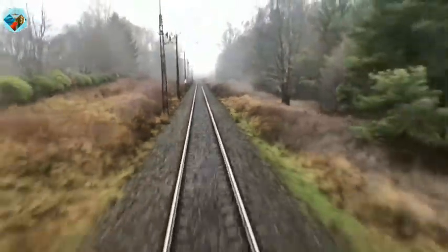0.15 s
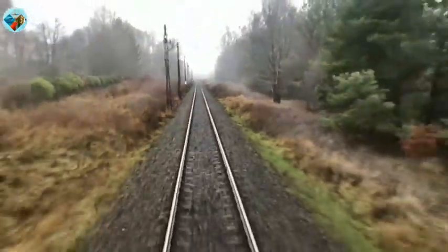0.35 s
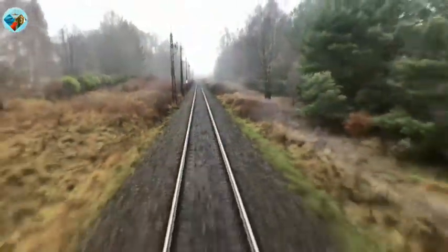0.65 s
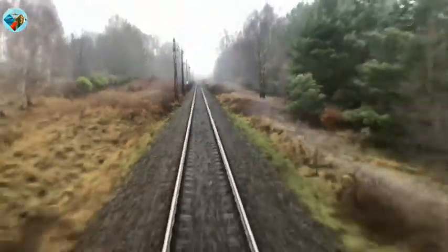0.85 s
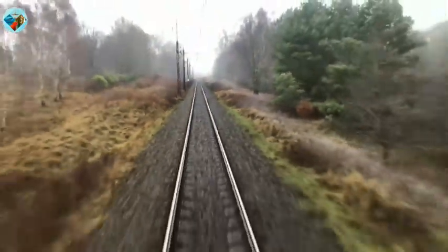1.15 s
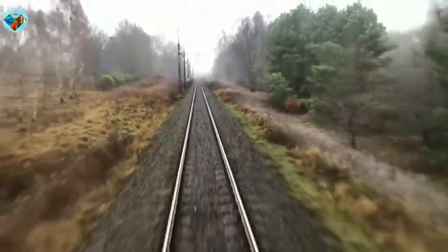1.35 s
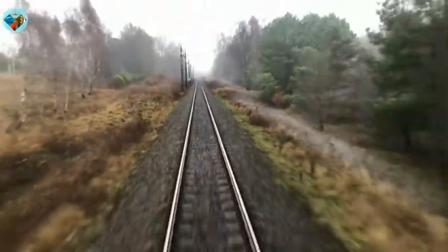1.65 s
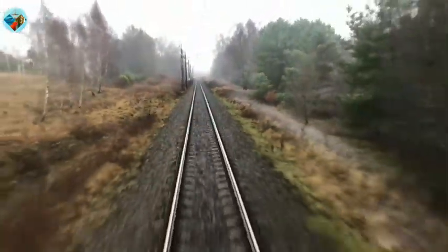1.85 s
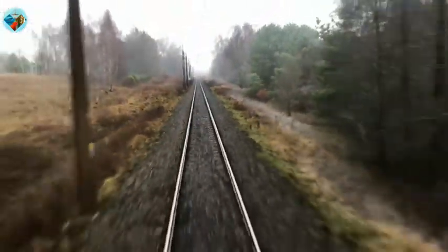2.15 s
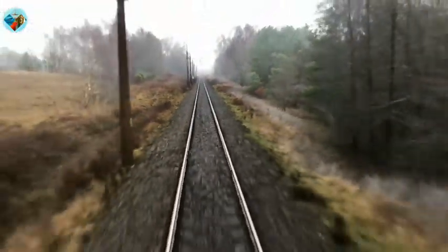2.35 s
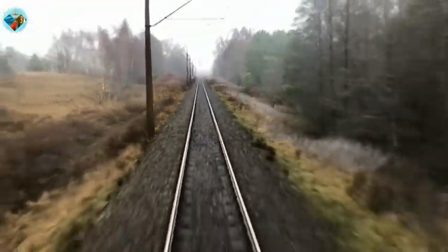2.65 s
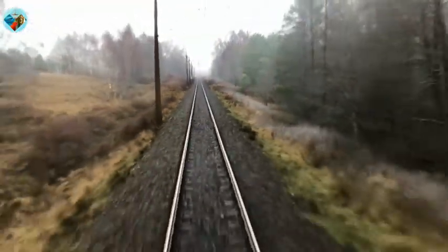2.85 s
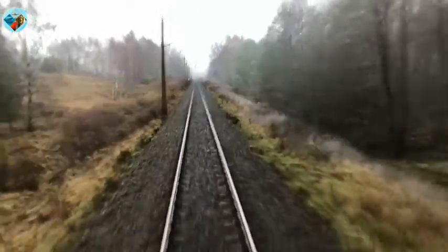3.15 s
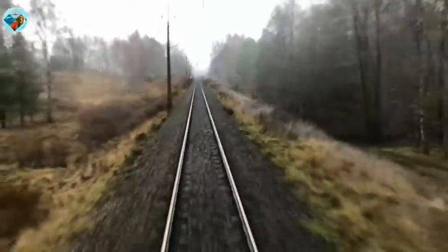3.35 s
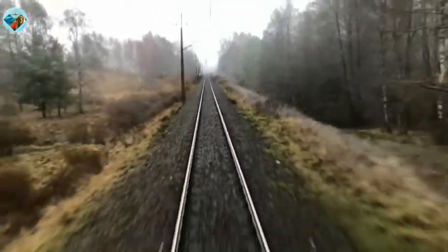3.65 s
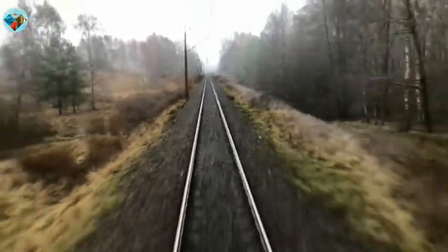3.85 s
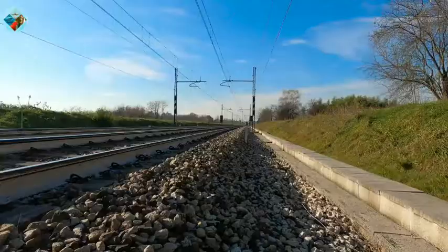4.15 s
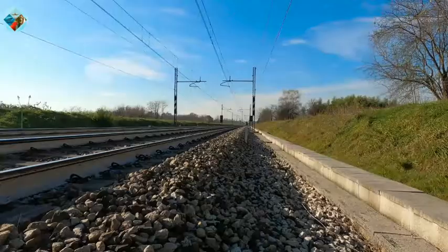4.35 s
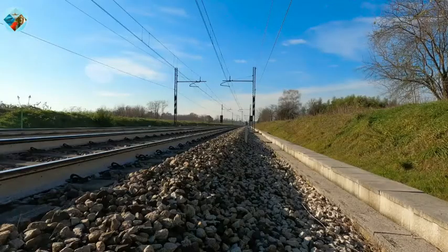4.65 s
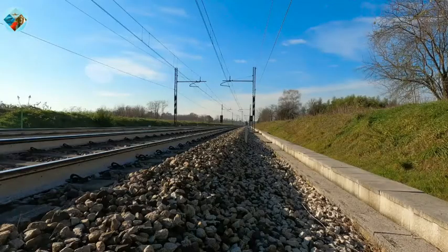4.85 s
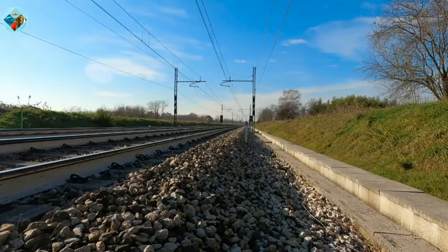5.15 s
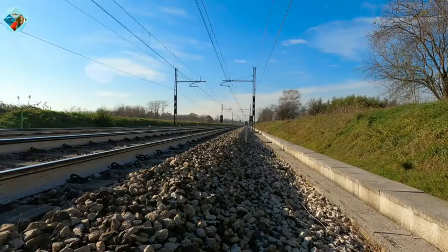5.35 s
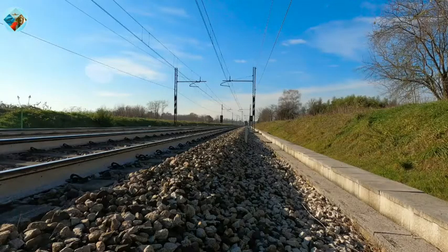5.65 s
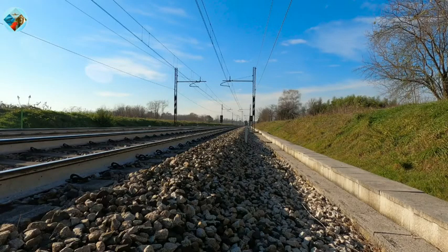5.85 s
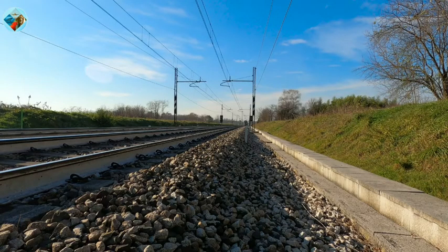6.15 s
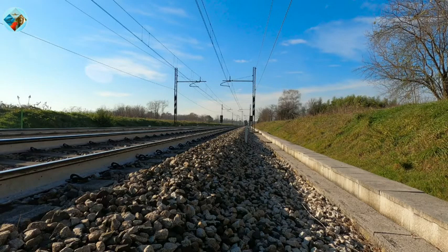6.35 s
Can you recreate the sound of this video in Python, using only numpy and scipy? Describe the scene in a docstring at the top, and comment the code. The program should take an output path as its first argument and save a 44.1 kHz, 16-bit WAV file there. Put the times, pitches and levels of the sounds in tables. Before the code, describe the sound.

From 0 to 4.1 s, the front of a running train: a loud, continuous, rough roar of wheels on rails, with deep boom and rumble swaying slightly. A low shaft throb comes and goes, and thin wavering gear whines thread through the middle and upper range. Small, very high, rough flange squeaks flick by around 1.1-1.4, 1.9-2.0 and 3.45 s; airy puffs pass, the clearest at 2.3 s. At 4.1 s the ride cuts dead, leaving a tiny gap. From 4.15 s, a much quieter open trackside: low wind buffets the microphone, gusting near 4.6 s and slowly freshening, over faint murmur and thin air, with a slight rustle at 4.6 s. A narrow trembling metallic rail hum rises as a far train nears. Isolated soft pings appear at 5.2, 5.7 and 5.9 s, then crowd quickly from 6.2 s until the abrupt end around 6.5 s.

```python
"""First the front of a running train: wheels roar on the rails, a shaft throbs, gears whine, flanges squeak.
Noise with shaped tone makes the roar and puffs of air; wavering sines make the throb, whine and squeaks.
After a cut and a short silence, a quiet trackside: wind on the microphone (low noise) and a rail that
starts to sing (narrow noise with short pulses) as a far train comes nearer."""
import sys
import numpy as np
from scipy import signal
from scipy.fft import rfft, irfft, next_fast_len
from scipy.io import wavfile
from scipy.ndimage import uniform_filter1d, map_coordinates

SR = 44100
rng = np.random.default_rng(int(sys.argv[2]) if len(sys.argv) > 2 else 0)


def to_linear_factor(level_db):
    """Convert decibel levels (scalar or array-like) to linear amplitude factors."""
    exponent = np.asarray(level_db, float) / 20
    return 10 ** exponent


def unload_wav(signal):
    """Save mono or channel-first audio to the path in sys.argv[1] as 16-bit WAV at rate SR, clipped to [-1, 1]."""
    wavfile.write(
        sys.argv[1],
        SR,
        np.round(np.clip(np.atleast_2d(signal).T, -1, 1) * 32767).astype(np.int16),
    )


N = 285768  # samples
CUT_S, RESUME_S = 4.0935, 4.1525  # the ride ends; the trackside begins


def unit(x):
    """Scales a sound to an average strength (rms) of 1."""
    return x / np.sqrt(np.mean(x ** 2) + 1e-20)


def curves(rows):
    """Draws straight lines between rows: one curve for each column after the time."""
    s, *cols = np.transpose(rows)
    return [np.interp(np.arange(N) / SR, s, c) for c in cols]


def wobble(rate):
    """A smooth random curve through `rate` random points a second."""
    coarse = np.arange(0, N + 32, 32)  # worked out at every 32nd sample, then joined by lines
    points = rng.standard_normal(int(N * rate / SR) + 4)
    curve = map_coordinates(points, [coarse * rate / SR])
    return np.interp(np.arange(N), coarse, curve)


def colour(points):
    """Turns (pitch_hz, level_db) points into a gain for any pitch, joined on a log pitch axis."""
    f, db = np.transpose(points)
    return lambda hz: to_linear_factor(np.interp(np.log(hz + 1), np.log(f + 1), db))


def rush(gain, patchy_db):
    """Noise of rms 1 with this gain over pitch, uneven in patches of time and pitch."""
    z = signal.stft(rng.standard_normal(N), nperseg=512)[2]
    field = uniform_filter1d(rng.standard_normal(z.shape), 5, 0)
    field = uniform_filter1d(field, 14, 1)
    noise = signal.istft(z * to_linear_factor(patchy_db * unit(field)), nperseg=512)[1][:N]
    m = next_fast_len(N + 8192)
    spectrum = rfft(noise, m) * gain(np.fft.rfftfreq(m, 1 / SR))
    return unit(irfft(spectrum, m)[:N])


def bump(s, length):
    """A bell-shaped swell around time s."""
    return np.exp(-8 * ((np.arange(N) / SR - s) / length) ** 2)


def swells(rows):
    """Adds up bell-shaped swells in amplitude."""
    return sum(to_linear_factor(db) * bump(s, length) for s, length, db in rows)


def lift_db(rows):
    """Adds up bell-shaped lifts and dips in dB."""
    return sum(db * bump(s, length) for s, length, db in rows)


def tone(hz):
    """A sine of rms 1 that follows a pitch curve."""
    return np.sqrt(2) * np.sin(2 * np.pi * (np.cumsum(hz) / SR + rng.random()))


def rolling():
    """Rough rail shakes wheels and car body: four bands of noise follow the roughness and the shake."""
    # tone of the wheel noise: pitch_hz, level_db (per Hz)
    wheel_colour = [(15, -33.5), (25, -8), (113, 3), (204, -2.5), (240, -3), (458, -9.5), (873, -4),
                    (1810, -20), (2010, -11), (2180, -19), (3010, -24.5), (3740, -25), (5300, -35.5),
                    (9850, -44.5), (15600, -56)]
    # resonances of car body and wheels: pitch_hz, width_hz, level_db
    resonances = [(58, 19, -0.5), (80.2, 30, 4), (100, 14, -3), (245.5, 51, 5.5), (393, 37, 4.5),
                  (467, 63, -1), (916, 68, 2), (1210, 40, -1), (1347, 33, 6.5), (1593, 120, 5),
                  (1726, 120, 0), (1920, 91, -0.5), (2040, 110, 1.5), (2090, 40, -3), (2280, 50, 2.5),
                  (2480, 34, 5.5), (3775, 49, 7), (6900, 450, 3)]
    # the ride: time_s, roughness under the wheels (level_db), shake of the car body above it (level_db)
    ride = [(0.0, -22.5, -6.5), (0.06, -22.5, -2.5), (0.66, -21.5, -2.5), (1.0, -21, 2.5), (1.15, -20, -5),
            (1.19, -24.5, 2), (1.28, -19, -7), (1.31, -21.5, -1), (1.87, -21, -2.5), (1.95, -18, -10.5),
            (2.01, -21.5, 0.5), (2.07, -22, -8), (2.31, -19, -0.5), (2.41, -21.5, -2), (3.99, -22, 0),
            (4.08, -19.5, -4.5)]

    def body(hz):
        peaks_db = sum(db / (1 + (2 * (hz - c) / w) ** 2) for c, w, db in resonances)
        return colour(wheel_colour)(hz) / (1 + (36 / (hz + 1)) ** 4) * to_linear_factor(peaks_db)

    def above(hz, edge):
        return 1 / (1 + (edge / (hz + 1)) ** 8)

    def band(low_hz, high_hz, patchy_db):
        def gain(hz):
            return body(hz) * np.sqrt(np.abs(above(hz, low_hz) - above(hz, high_hz)))
        return rush(gain, patchy_db)

    rough_db, shake_db = curves(ride)
    on_board = slice(round(CUT_S * SR))
    mean_db = np.mean(rough_db[on_board])
    rough_swing_db = rough_db - mean_db
    shake_swing_db = shake_db - np.mean(shake_db[on_board])
    jolt_db = .25 * wobble(14)  # bumps in the track reach every band
    # low_hz, high_hz, dB over mean roughness, share of its swing, share of the shake, own sway dB, patches dB
    bands = [(1, 160, -5.5, 0.6, 1.13, 1.16, -0.1),  # boom
             (160, 450, -3, 1.2, 0.62, 1.53, 0.2),  # rumble
             (450, 2800, -0.24, .9, .05, 0.35, 1.52),  # roar
             (2800, SR, -19.5, .5, 0.1, 0.48, 1.5)]  # hiss
    out = np.zeros(N)
    for low_hz, high_hz, db, swing, shaken, sway_db, patchy_db in bands:
        level_db = mean_db + db + swing * rough_swing_db + shaken * shake_swing_db
        level_db = level_db + sway_db * wobble(8) + jolt_db
        out += to_linear_factor(level_db) * band(low_hz, high_hz, patchy_db)
    return out


def shaft():
    """A turning shaft throbs low at its own rate; a tone near the third multiple swells now and then."""
    # the low throb sinks: middle_s, length_s, change_db
    throb_lulls = [(0.05, .5, -4), (1.08, .3, -18), (1.37, .2, -8), (2.15, .7, -16), (2.6, .15, -8),
                   (3.38, .15, -9), (3.65, .2, -13), (4.09, .15, -8)]
    # the third multiple swells: middle_s, length_s, level_db
    third_swells = [(.55, .2, -32), (.86, 0.57, -23.5), (1.27, 0.23, -36), (1.84, 0.45, -39),
                    (2.49, .15, -42), (2.7, .3, -41), (3.15, 0.56, -28.5), (3.47, 0.17, -32),
                    (3.9, 0.37, -32.5)]
    throb_db, third_db = -30.5, -45.5  # throb between its lulls; third multiple between its swells
    throb_level = to_linear_factor(throb_db + lift_db(throb_lulls) + .8 * wobble(5))
    throb = throb_level * tone(38 + 0.36 * wobble(4.0))  # Hz
    third = (to_linear_factor(third_db) + swells(third_swells)) * tone(111.5 + 1.087 * wobble(4.1))  # Hz
    return throb + third


def gears():
    """Gear teeth give thin lines that waver in pitch and level; the load on them lifts the upper lines."""
    # lines of the whine: pitch_hz, level_db, waver_hz
    whine_lines = [(232.5, -37, 2), (817, -36, 1.5), (854.8, -34, 1.5), (891, -41, 2), (914, -41, 2),
                   (932, -42, 2), (1057, -44, 2), (1092, -43, 2), (1142.6, -44, 2), (1222, -47, 4),
                   (1890, -52, 4), (1927, -49, 5), (1982, -44, 4), (2020, -40, 4), (2075, -50, 6),
                   (2364, -56, 6), (2475, -53, 5), (2789, -57, 6), (3354, -65, 6)]
    # gear load: time_s, change_db
    gear_load = [(0, 4.5), (.8, 5), (1.1, -8), (1.5, 3), (2.12, 2), (2.5, 3), (3.3, 0), (3.8, 3.5),
                 (4.08, -5)]
    load_db, = curves(gear_load)
    out = np.zeros(N)
    for hz, db, waver_hz in whine_lines:
        flutter = unit(to_linear_factor(4 * wobble(16)))
        level = to_linear_factor(db + load_db * (hz > 1500))
        out += level * flutter * tone(hz + waver_hz * wobble(14))
    return out


def flanges():
    """Wheel flanges give short rough squeaks, most of them sagging in pitch."""
    # squeaks: middle_s, length_s, start_hz, end_hz, level_db
    squeaks = [(.97, .08, 11100, 10900, -68), (1.10, .06, 13400, 13200, -66), (1.111, .07, 9800, 9700, -55),
               (1.15, .05, 9600, 9500, -54), (1.158, .09, 13000, 13000, -64), (1.275, .05, 9800, 9750, -58),
               (1.337, .09, 15200, 13980, -63), (1.345, .07, 9550, 9300, -54),
               (1.42, .05, 12800, 12600, -57), (1.43, .05, 9450, 9160, -58),
               (1.85, .05, 14600, 14100, -67.5), (1.925, 0.065, 10150, 10000, -52),
               (1.92, .09, 13900, 13400, -63), (1.985, .07, 9850, 9700, -49.5),
               (2.015, .04, 12800, 12300, -64), (3.396, .04, 9700, 9560, -54),
               (3.443, .08, 13900, 13500, -64), (3.449, .05, 10100, 9750, -46),
               (3.48, .07, 10000, 10100, -54.5)]
    out = np.zeros(N)
    rough, flutter = wobble(400), wobble(70)
    for s, length, start_hz, end_hz, db in squeaks:
        i = np.arange(round((s - length) * SR), round((s + length) * SR))
        u = (i / SR - s) / length  # -0.5 at the start pitch, 0.5 at the end pitch
        pitch = (start_hz + end_hz) / 2 + (end_hz - start_hz) * u
        pitch = pitch + .010 * start_hz * rough[i]
        out[i] += to_linear_factor(db + 3 * flutter[i]) * np.exp(-8 * u ** 2) * tone(pitch)
    return out


def swishes():
    """Puffs of bright air noise over a faint flicker that never quite rests."""
    # puffs: middle_s, length_s, level_db
    puffs = [(.43, 0.06, -57), (.66, 0.14, -58), (.97, 0.16, -52), (1.33, .1, -59.5), (1.8, 0.11, -55),
             (1.94, 0.12, -64), (2.275, .12, -42), (2.72, 0.065, -63), (3.15, .06, -66), (3.45, 0.15, -51),
             (4.03, 0.11, -55.5)]
    # tone of the air: pitch_hz, level_db (per Hz)
    puff_colour = [(500, -59), (1500, -9), (4000, 2), (9000, -3), (15500, -10.5)]
    flicker = to_linear_factor(-67 + 3 * wobble(30))  # dB
    return (swells(puffs) + flicker) * rush(colour(puff_colour), patchy_db=1.2)


def since_resume():
    """Seconds since the trackside began, zero before that."""
    return np.maximum(np.arange(N) / SR - RESUME_S, 0)


def nearness_db():
    """Growth of the far train's sound as the distance and the loss along the rail shrink."""
    arrival_s, rail_loss_db_per_s = 7.26, 4.5  # the arrival lies after the end of the sound
    since = since_resume()
    distance = np.maximum(1 - since / (arrival_s - RESUME_S), .05)  # 1 = where it is at first
    return rail_loss_db_per_s * since - 20 * np.log10(distance)


def wind():
    """Wind buffets the microphone: low uneven noise that freshens, with gusts and lulls."""
    # gusts and lulls: middle_s, length_s, change_db
    gusts = [(4.6, .12, 5.5), (5.21, .1, -10), (5.4, .1, 4), (5.46, .06, -9)]
    # tone of the buffeting: pitch_hz, level_db (per Hz)
    buffet_colour = [(5.9, -48), (10, -17), (30, -3), (54, 0), (74, -7), (92, -16), (115, -35), (150, -68),
                     (250, -120)]
    start_db, rise_db_per_s = -42, 2.5
    level_db = start_db + rise_db_per_s * since_resume() + lift_db(gusts)
    return to_linear_factor(level_db) * unit(to_linear_factor(0.63 * wobble(12)) * rush(colour(buffet_colour), patchy_db=1.5))


def rail_song(near_db):
    """The rail carries the far wheels as a narrow trembling band of noise, with short ringing pulses."""
    # swells of the song: middle_s, length_s, change_db
    song_swells = [(4.68, 0.28, 4), (4.95, .15, 0.5), (5.47, 0.33, 3.5)]
    # tone of the song: pitch_hz, level_db (per Hz)
    song_colour = [(400, -120), (700, -60), (830, -42), (900, -21), (950, -22), (985, -13.5), (1085, -10.5),
                   (1130, -21), (1155, 0.5), (1210, 0.5), (1290, -6), (1345, -11.5), (1365, -13),
                   (1420, -21), (1460, -20), (1600, -62), (3000, -120)]
    # short louder pulses: middle_s, peak level_db, pitch_hz
    pings = [(5.2273, -57.5, 1230), (5.7322, -48.5, 1275), (5.8823, -40.5, 1160), (6.0804, -50, 1204),
             (6.1163, -55, 1130), (6.2308, -38, 1204), (6.266, -38, 1215), (6.3054, -33.5, 1210),
             (6.3438, -41.5, 1210), (6.3791, -29.5, 1196), (6.418, -39, 1215), (6.455, -40, 1215)]
    trembling = unit(to_linear_factor(1.7 * wobble(40)) * rush(colour(song_colour), patchy_db=-0.2))
    song = to_linear_factor(-69.5 + near_db + lift_db(song_swells)) * trembling
    t = np.arange(N) / SR
    pulses = sum(to_linear_factor(db) * bump(s, 0.009) * np.sin(2 * np.pi * hz * t) for s, db, hz in pings)
    return song + pulses


def rustling():
    """Faint bright rustles: short swells of high noise."""
    # rustles: middle_s, length_s, level_db
    rustles = [(4.275, .03, -82), (4.605, 0.066, -75), (5.61, .05, -83), (6.03, .06, -85)]
    # tone of the rustles: pitch_hz, level_db (per Hz)
    rustle_colour = [(1000, -20), (2500, 2), (7000, 1), (9000, -8), (12500, -12), (13500, -39)]
    return swells(rustles) * rush(colour(rustle_colour), patchy_db=1.5)


def far_background(near_db):
    """Low murmur, soft air and thin treble beside the track: noises that grow a little with the song."""
    # tone of each layer: pitch_hz, level_db (per Hz)
    murmur_colour = [(68, -28), (115, 4.5), (184, -7.5), (230, -9), (266, -14), (339, -17), (678, -23.5),
                     (850, -24), (1100, -43), (1870, -120)]
    air_colour = [(850, -32), (1450, -3), (1970, -7), (2130, -10), (2510, -14), (3040, -15.5), (5000, -28),
                  (6500, -53), (11000, -120)]
    treble_colour = [(2000, -120), (3500, -30), (4500, -10), (7300, -8), (7850, -4), (8200, -9),
                     (9300, -24), (9570, -1), (9800, -24), (10300, -28), (10800, -18), (11600, -6),
                     (12000, -2), (13000, -8), (13500, -40), (15700, -60)]
    # the factor of near_db is each layer's share of the song's growth
    murmur = to_linear_factor(-65.5 + 0.14 * near_db) * rush(colour(murmur_colour), patchy_db=0.9)
    air = to_linear_factor(-76.5 + 0.15 * near_db) * rush(colour(air_colour), patchy_db=0.4)
    treble_level = to_linear_factor(-86.5 + 0.18 * near_db + .8 * wobble(25))
    treble = treble_level * rush(colour(treble_colour), patchy_db=1.0)
    return murmur + air + treble


def scene():
    """On board until the cut, silence, then beside the track with a very short fade at the end."""
    t = np.arange(N) / SR
    on_board = rolling() + shaft() + gears() + flanges() + swishes()
    on_board = on_board * np.clip((CUT_S - t) / 0.001, 0, 1)
    near_db = nearness_db()
    trackside = wind() + rail_song(near_db) + rustling() + far_background(near_db)
    end_fade_s = .004
    trackside = trackside * (t >= RESUME_S) * np.clip((t[-1] - t) / end_fade_s, 0, 1)
    return (on_board + trackside)[None]  # one channel


def roll_off(x):
    """The treble ends steeply here."""
    return signal.sosfilt(signal.butter(12, 15710, fs=SR, output="sos"), x)


def record(dry):
    """Turns the finished mix into the sound that is written."""
    return roll_off(dry)


dry = scene()
out = record(dry)
unload_wav(out)
```